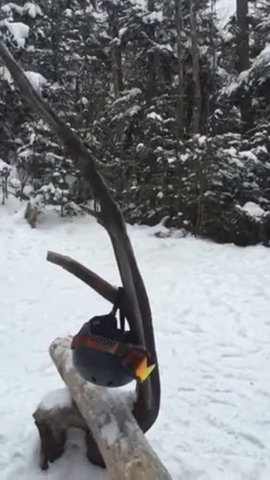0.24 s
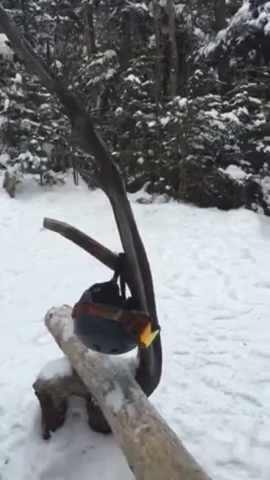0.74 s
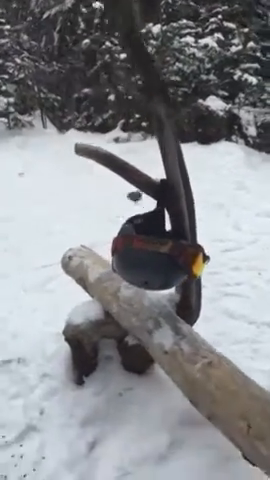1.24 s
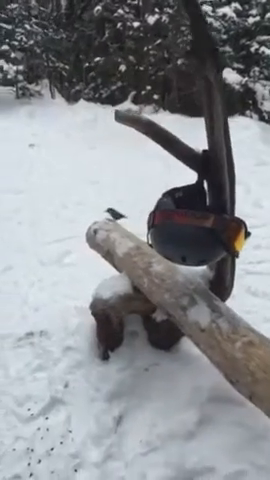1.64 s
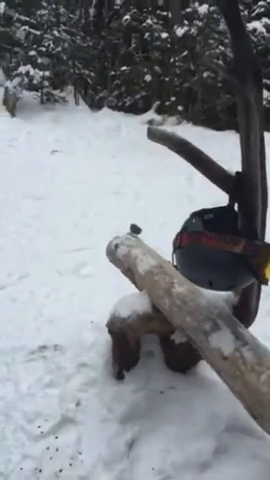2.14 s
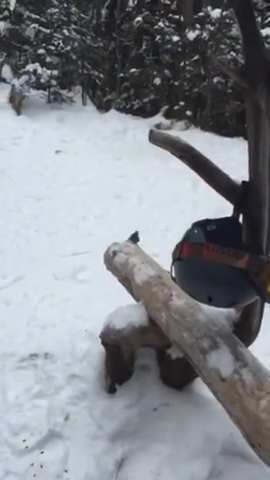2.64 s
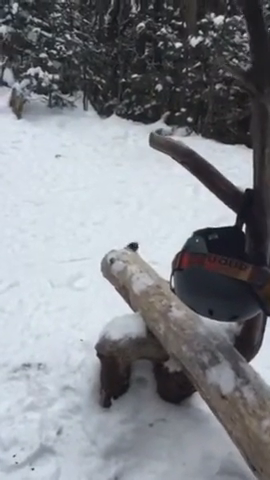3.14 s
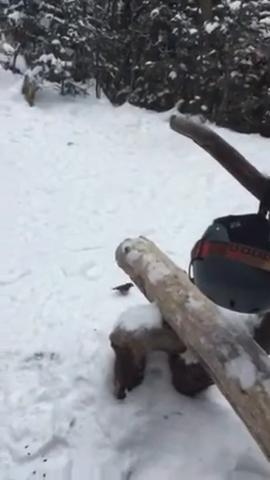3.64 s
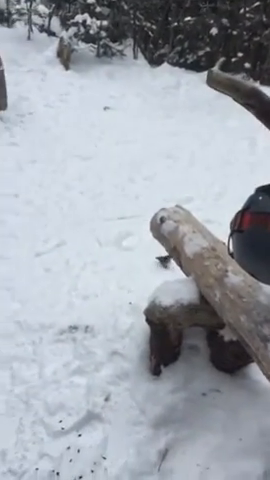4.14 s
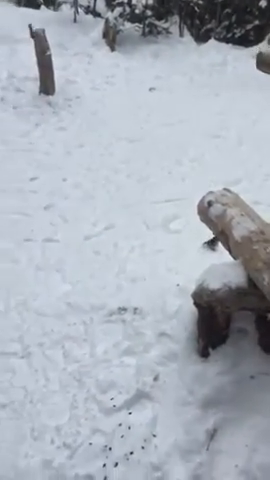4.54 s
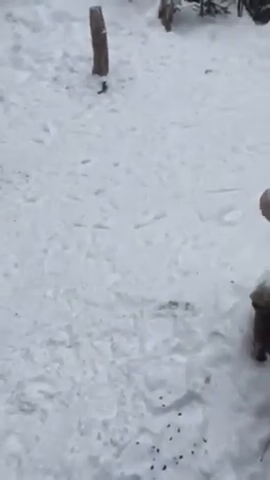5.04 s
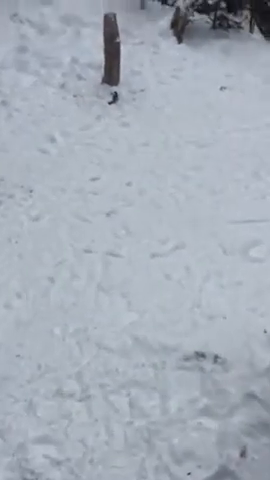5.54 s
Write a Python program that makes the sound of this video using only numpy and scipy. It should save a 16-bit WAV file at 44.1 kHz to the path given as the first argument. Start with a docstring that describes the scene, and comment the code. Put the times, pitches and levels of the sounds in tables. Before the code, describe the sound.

Quiet snowy woods, mono, close to a hand-held microphone, with very faint air. From 0.2 s a few weak snow crackles and low, soft bird-like peeps near 0.4 s. From about 0.6 to 1.6 s the first boot step crunches: crisp cracks joining into a gritty, uneven creak that turns knockier near 1.45 s, with a short cloth swish near 1.1 s. Then a hush until 3.9 s, holding a faint peep at 1.7 s, tiny ticks, weak snow slips around 2.5-2.9 s and a light cloth rustle near 3.5 s. A sharp crack at 3.9 s opens the second creaking step, until about 4.5 s; a rough rub and wavering squeak follow to 4.75 s. From 4.95 s heavier, thumpier crunches build into a dense creak around 5.4 s and settle until nearly 5.8 s, with jacket swish, low rumble and a faint high bird whistle near 5.1 s.

```python
"""Quiet woods: boots shift in cold packed snow, close below a hand-held camera.
The snow gives way in slips: single ones while the weight shifts, creaking runs in three slow steps.
Each slip mixes a thump, a knock, a crack and a chip, rung as one short wave that falls in pitch.
Shaped noise makes jacket swishes, soft rumble and air; a sole scrapes with a rub and a rough squeak.
Small birds call faintly as short sine whistles, and pulses through a resonance make quick runs of tiny ticks."""
import sys
import numpy as np
from scipy import signal
from scipy.fft import rfft, irfft, next_fast_len
from scipy.io import wavfile
from scipy.ndimage import map_coordinates

SR = 44100
rng = np.random.default_rng(int(sys.argv[2]) if len(sys.argv) > 2 else 0)


def wrap_up_sound(samples):
    """Save the sound to the file named by the first command line argument, as 16-bit audio."""
    columns = np.atleast_2d(samples).T
    # keep every value between -1 and 1, then stretch to whole-number steps
    tamed = np.clip(columns, -1, 1)
    steps = np.round(tamed * 32767).astype(np.int16)
    wavfile.write(sys.argv[1], SR, steps)


N = 254898  # samples in the scene

# Single slips of the snow. Each row: time in seconds, strength (knock and crack together) in dB,
# weight (thump over strength) in dB, crispness (crack over knock) in dB.
SLIPS = [(0.19, -53.5, -7, -3), (0.313, -48.5, -18, 9), (0.412, -62, -22, 15), (0.451, -60, -8, -6),
         (0.615, -38.5, -19, 18), (0.714, -51, 4, 1), (0.731, -53, 8, -6), (0.755, -42.5, -10.5, 7),
         (0.78, -42.5, 0.5, 34), (0.805, -37.5, -7, 22), (0.828, -38, -10, 30), (0.847, -43.5, 3, 11),
         (0.901, -44, 3, 3), (1.02, -41, -23, -2.5), (1.036, -38, -12, 7), (1.084, -40, -2, 6),
         (1.128, -35, -6.5, 3.5), (1.171, -38.5, -6, -8), (1.193, -41, 1, 14), (1.205, -38, -21, 8),
         (1.218, -42, -15, 4), (1.382, -39.5, -9, -5), (1.407, -36, -10, -2.5), (1.443, -30, -14, -3),
         (1.455, -34, -8, -7), (1.474, -37, -12, -5), (1.487, -32.5, -10.5, 2.5), (1.533, -35, -15, -1),
         (1.55, -37, -9, -11), (2.45, -48, -6, -30), (2.491, -59, -13, -12), (2.509, -55, -9, -11),
         (2.552, -50, -9, -8), (2.814, -50, -28, -1.5), (2.857, -52, 0.5, 5), (2.922, -49, -1.5, 3),
         (3.227, -59, -13, 10), (3.273, -56, -25, 3.5), (3.61, -52, -4, -34), (3.821, -58.5, -15, -6),
         (3.871, -53.5, -20, -10), (3.91, -31.5, -8.5, -9.5), (3.927, -45, -28, -5), (4.021, -37, -22, 4),
         (4.037, -38, -26, 3.5), (4.058, -33.5, -12.5, -7), (4.08, -37, -29, -13), (4.102, -39, -14, -9),
         (4.171, -38, -18, -7), (4.29, -40.5, -29, -3.5), (4.395, -39, -5, -5), (4.449, -35, -9.5, 5.5),
         (4.495, -35.5, -3, 1), (4.923, -54, -12, -5), (4.973, -40, -8.5, -2), (5.009, -34, -15, -5),
         (5.05, -33.5, -10, -6.5), (5.076, -41, -31, -1), (5.109, -29, -5, -2.5), (5.157, -31.5, -1.5, 14),
         (5.191, -34, 0, 2.5), (5.223, -36, 0, -0.5), (5.245, -39.5, -29, -13), (5.262, -36, 3, -6),
         (5.291, -41, 8.5, 3), (5.304, -41.5, -12, -3), (5.313, -38.5, 1, -7), (5.327, -40, -1, 1),
         (5.336, -31, -0.5, -7), (5.361, -37.5, 2, 6), (5.503, -34, -0.5, 1.5), (5.595, -35, -29, -4),
         (5.612, -40.5, -9, 5), (5.639, -35.5, -11, -1), (5.649, -39, -15, -2), (5.666, -43, -11, 12),
         (5.68, -41, -12, -4), (5.686, -37.5, -9, -2), (5.698, -39, -6, 3), (5.739, -39.5, -14, -7),
         (5.761, -42.5, -11, 6)]
# What a slip rings with: one list each for thump, knock, crack and chip.
# Each row: pitch in Hz and sharpness Q, both before the snow patch changes them, level within its list in dB.
BOOT_ON_SNOW = [
    [(214, 0.96, 0)],
    [(560, 4.13, 7), (1040, 1.46, -1)],
    [(1410, 1.03, 0.5), (2326, 2.8, 6.5), (3544, 4.7, -5.5)],
    [(4050, 5.1, 2.5), (4490, 1, -3.5)],
]
SLIP_S = .01  # seconds over which the level of a slip or tick is counted
SLIP_SIZE = 2048  # samples in one slip wave
WAKE_S = .016  # seconds for the scattered tail of a slip to fall by 60 dB


def amp(db):
    """Turn decibels into a gain."""
    return 10 ** (np.asarray(db) / 20)


def unit(x):
    """Scale x to an average (rms) level of 1."""
    return x / np.sqrt(np.mean(x ** 2) + 1e-20)


def curve(rows):
    """Draw straight lines through (seconds, dB) rows, one level per sample."""
    s, db = np.transpose(rows)
    return np.interp(np.arange(N) / SR, s, db)


def wobble(rate):
    """Draw a smooth random curve through `rate` random points a second."""
    points = rng.standard_normal(int(N * rate / SR) + 4)
    return map_coordinates(points, [np.arange(N) * rate / SR])


def filtered(x, response):
    """Multiply the spectrum of x by a response to frequency in Hz."""
    size = next_fast_len(N + SR // 2)
    spectrum = rfft(x, size) * response(np.fft.rfftfreq(size, 1 / SR))
    return irfft(spectrum, size)[..., :N]


def noise(colour):
    """Make noise of rms 1 whose spectrum follows (Hz, dB) points."""
    f, db = np.transpose(colour)
    shaped = filtered(rng.standard_normal(N), lambda hz: amp(np.interp(np.log(hz + 1), np.log(f), db)))
    return unit(shaped)


def air(drift_db):
    """The faint rush of the woods: coloured noise whose level drifts slowly."""
    # Each row: frequency in Hz, relative level in dB.
    air_colour = [(22, -32), (47, -9), (131, -4), (426, -13), (1020, -20), (5930, -27.5), (15500, -37.5)]
    return amp(-70.5 + drift_db * wobble(2.76)) * noise(air_colour)


def handling():
    """A soft rumble as the body and the camera move: low noise that swells and sinks."""
    # Each row: time in seconds, level in dB.
    rumble_level = [(0, -82.5), (3.7, -76), (3.87, -57), (3.97, -73), (4.5, -61.5), (4.75, -78.5),
                    (4.95, -55.5), (5.3, -63.5), (5.645, -48.5), (5.78, -68)]
    # Each row: frequency in Hz, relative level in dB.
    rumble_colour = [(20, -35), (45, -17), (75, 2.5), (120, -5), (250, -14), (600, -37)]
    return amp(curve(rumble_level)) * noise(rumble_colour)


def swish(gain_db, flutter_db, fold_db):
    """Cloth and powder hiss swells and fades with each move, fluttering as fibres catch and folds flap."""
    # Each row: time of the peak in seconds, level before gain_db in dB, rise and fall in seconds.
    swishes = [(0.9, -58.5, 0.25, 0.97), (1.08, -42, 0.056, 0.027), (1.29, -56, 0.13, 0.095),
               (1.52, -61.5, 0.42, 0.1), (1.718, -66.5, 0.079, 0.066), (3.459, -62.5, 0.13, 0.21),
               (4.082, -57.5, 0.1, 0.058), (4.48, -55.5, 0.2, 0.28), (4.69, -52, 0.38, 0.11),
               (5.47, -48, 0.23, 0.13), (5.77, -53, 0.12, 0.095)]
    # Each row: frequency in Hz, relative level in dB.
    swish_colour = [(150, -14), (400, 2.5), (1200, 1.5), (3000, 0), (4500, -1.5), (6500, -9), (9000, -5),
                    (10400, -12.5), (12000, -7.5), (15500, -18.5)]
    fade_db, roundness = 22, 1.26  # drop over one rise or fall; roundness of the peak
    t = np.arange(N) / SR
    power = amp(-81) ** 2  # cloth between swishes, also before gain_db
    for s, db, rise, fall in swishes:
        away = np.maximum((s - t) / rise, (t - s) / fall)
        power = power + amp(db - fade_db * np.minimum(away, 10) ** roundness) ** 2
    flutter = amp(flutter_db * wobble(210) + fold_db * wobble(61))
    hiss = unit(flutter * noise(swish_colour))
    return amp(gain_db) * np.sqrt(power) * hiss


def patch_at(times):
    """Look up the snow under the boot at each time: grit, ring, two tunings and one altered band."""
    # The bounce off each patch weakens one band, or lifts it where the last column is above 0.
    # Each row: start in seconds, grit (chip over crack) in dB, factor on the Q of thump and knock,
    # factor on their pitch, factor on the pitch of crack and chip, band centre in Hz, band change in dB.
    patches = [(0, -4.5, 0.7, 0.86, 0.62, 1980, -4), (0.7, -9, 3.13, 1.01, 0.89, 2940, -5),
               (0.84, -1.5, 1.86, 1.02, 0.91, 2660, -3.5), (1.028, -8, 0.95, 0.92, 1.05, 2540, -6),
               (1.185, -4, 0.81, 1.04, 1.05, 2440, -11), (1.23, -5.5, 2.1, 0.92, 0.84, 3240, -8),
               (1.33, -17, 1.42, 1.02, 0.93, 366, -8.5), (2.0, -12, 0.87, 1.02, 0.82, 950, -17),
               (2.7, -3.5, 0.98, 1.3, 0.79, 1040, 3), (3.1, -7.5, 1, 1, 1.42, 1980, 3),
               (3.85, -7.5, 0.68, 0.86, 1.12, 1030, 0), (4.0, -5, 0.93, 0.96, 1, 3320, -8),
               (4.21, -9.5, 1.1, 1.05, 1.24, 2970, -22), (4.35, -10, 1.25, 1.095, 1, 2497, -11),
               (4.9, -9, 0.8, 1, 1.03, 2480, -3), (5.24, -9.5, 1.09, 1.077, 1.065, 1144, -14),
               (5.55, -7, 1.6, 1.194, 0.9, 3270, -6)]
    rows = np.array(patches, float)
    return rows[np.searchsorted(rows[1:, 0], times), 1:].T


def slip_levels(times, strength_db, weight_db, crisp_db, extra_grit_db):
    """Share each slip's strength among thump, knock, crack and chip."""
    knock_db = strength_db - 10 * np.log10(1 + amp(crisp_db) ** 2)
    crack_db = knock_db + crisp_db
    chip_db = crack_db + patch_at(times)[0] + extra_grit_db
    return np.transpose([strength_db + weight_db, knock_db, crack_db, chip_db])


def slip_sounds(times, levels_db, thump_tune, detune, lag_s, scatter_hz):
    """Ring boot and snow once for each row of (thump, knock, crack, chip) levels."""
    count = len(levels_db)
    hz = np.fft.rfftfreq(SLIP_SIZE, 1 / SR) + 1
    t = np.arange(SLIP_SIZE) / SR
    chance = rng.standard_normal((count, len(BOOT_ON_SNOW) + 1))
    _, ring, tune, crack_tune, dip_hz, dip_db = patch_at(times)[:, :, None]
    power = 0
    for k, modes in enumerate(BOOT_ON_SNOW):
        # every slip breaks at another spot under the sole and rings a little higher or lower
        f = hz * np.exp(detune * chance[:, [k]])
        if k == 0:
            f = f / thump_tune[:, None]
        # the patch sets the pitch of all four, but the sharpness of only thump and knock
        if k < 2:
            sharp, f = ring, f / tune
        else:
            sharp, f = 1, f / crack_tune
        bell = 0
        for centre, q, db in modes:
            off_centre = sharp * q * (f / centre - centre / f)
            bell = bell + (amp(db) / (1 + off_centre ** 2)) ** 2
        power = power + amp(levels_db[:, [k]]) ** 2 * bell / bell.mean(axis=1, keepdims=True)
    band = np.exp(-(np.log(hz / dip_hz) / .12) ** 2)
    power = power * amp(dip_db * band) ** 2
    # folding the cepstrum gives causal ringing: a sudden start, then decay
    cepstrum = irfft(np.log(power * SLIP_S * SR + 1e-14) / 2)
    cepstrum[:, 1:SLIP_SIZE // 2] *= 2
    cepstrum[:, SLIP_SIZE // 2 + 1:] = 0
    # low waves travel more slowly through the snow, so each slip is a quick falling chirp
    delay = lag_s * np.exp(0.31 * chance[:, -1:]) / (1 + (hz / 650) ** 2)
    lag = 2 * np.pi * np.cumsum(delay, axis=1) * SR / SLIP_SIZE
    # short waves scatter on the crystals and trail behind; long ones arrive whole
    wake = rng.standard_normal((count, SLIP_SIZE)) * amp(-60 * t / WAKE_S)
    wake = rfft(wake / np.linalg.norm(wake, axis=1, keepdims=True))
    scattered = hz / (hz + scatter_hz)
    paths = np.sqrt(1 - scattered) + np.sqrt(scattered) * wake
    waves = irfft(np.exp(rfft(cepstrum) - 1j * lag) * paths)
    return waves * np.minimum(1, 2 * (1 - t / t[-1]))  # fade out over the second half


def placed(times, waves):
    """Add up the waves, each starting at its own time."""
    start = np.round(np.maximum(times, 0) * SR).astype(int)
    index = start[:, None] + np.arange(SLIP_SIZE)
    return np.bincount(index.ravel(), waves.ravel(), N)[:N]


def single_slips():
    """The crust holds, then gives all at once."""
    times, strength_db, weight_db, crisp_db = np.transpose(SLIPS)
    levels_db = slip_levels(times, strength_db, weight_db, crisp_db, extra_grit_db=-0.5)
    waves = slip_sounds(times, levels_db, thump_tune=np.full(len(times), 0.92), detune=0.088,
                        lag_s=0.002044, scatter_hz=2800)
    return placed(times, waves)


def fine_ticks():
    """Quick runs of tiny ticks that die away: uneven pulses through one resonance a run."""
    # Each row: start in seconds, length in seconds, ticks per second, starting level in dB, ring in Hz.
    tick_runs = [(0.212, 0.044, 96, -66.5, 3860), (2.179, 0.04, 380, -69.5, 3780),
                 (2.452, 0.136, 150, -64, 1110), (3.606, 0.021, 300, -61, 730),
                 (2.607, 0.033, 200, -69.5, 3440), (3.28, 0.068, 107, -59, 3270)]
    q, fade_db = 3.5, 12.5  # sharpness of the ring; drop over one run
    jitter, spread_db = .35, 2.5  # unevenness in tick spacings and in level
    out = np.zeros(N)
    for s, length, rate, db, ring_hz in tick_runs:
        chance = rng.standard_normal((int(length * rate) + 1, 2))
        age = (np.arange(len(chance)) + jitter * chance[:, 0]) / rate
        sizes = amp(db - fade_db * age / length + spread_db * chance[:, 1])
        pulses = np.bincount(np.round((s + age) * SR).astype(int), sizes, N)
        ring = filtered(pulses, lambda hz: 1 / (1 + 1j * q * ((hz + 1) / ring_hz - ring_hz / (hz + 1))))
        out += ring * np.linalg.norm(sizes) / np.linalg.norm(ring) * np.sqrt(SLIP_S * SR)
    return out


def bird(waver_hz):
    """Thin whistles of small birds: sines that swell, sag a little in pitch and fade."""
    # Each row: start in seconds, length in seconds, middle pitch in Hz, peak level in dB.
    calls = [(0.35, 0.07, 1400, -71), (0.404, 0.079, 940, -66), (1.684, 0.085, 2240, -68),
             (4.887, 0.11, 8000, -75), (5.05, 0.097, 8150, -66)]
    sag_hz_per_s = 580
    t = np.arange(N) / SR
    song = np.zeros(N)
    for s, length, hz, db in calls:
        age = np.clip(t - s, 0, length)
        pitch = hz - sag_hz_per_s * (age - length / 2) + waver_hz * wobble(120)
        swell = np.sin(np.pi * age / length)
        song += amp(db) * swell * np.sin(2 * np.pi * np.cumsum(pitch) / SR)
    return song


def creak(step, weight_db, sink_db, crisp_db, pack_db, jitter, spread_db, detune, stiffen):
    """Stick and slip at an uneven rate; the faster the run, the smaller and grittier its slips."""
    s, rate, load_db = np.transpose(step)
    clock = np.arange(s[0] * SR, s[-1] * SR) / SR
    turns = np.cumsum(np.interp(clock, s, rate)) / SR  # slips counted so far
    chance = rng.standard_normal((int(turns[-1]), len(BOOT_ON_SNOW) + 2))
    times = np.interp(np.arange(len(chance)) + .5 + jitter * chance[:, 0], turns, clock)
    slip_rate = np.interp(times, s, rate)
    strength_db = np.interp(times, s, load_db) - 10 * np.log10(slip_rate * SLIP_S) + spread_db * chance[:, 1]
    # as the boot sinks in, sink_db is added to the thump; as the snow packs, pack_db is taken off the crack
    progress = (times - s[0]) / (s[-1] - s[0])
    # faster slipping chips off more crystals: 7 dB per octave, none added at 266 slips per second
    extra_grit_db = 7 * np.log2(slip_rate / 266)
    levels_db = slip_levels(times, strength_db, weight_db + sink_db * progress,
                            crisp_db - pack_db * progress, extra_grit_db)
    levels_db = levels_db + 2 * chance[:, 2:]  # 2 dB of scatter in each part
    # fast crushing shifts the thump: up towards a groan if stiffen is positive, down if negative
    thump_tune = 1 + stiffen * (slip_rate / rate.max()) ** 2
    waves = slip_sounds(times, levels_db, thump_tune, detune, lag_s=0.001704, scatter_hz=4330)
    # a single slip takes the strain, so the small ones that fall next to it stay weak
    gap_s = np.abs(times[:, None] - np.array(SLIPS)[:, 0]).min(axis=1)
    return placed(times, waves * np.clip(gap_s * slip_rate, 0, 1)[:, None])


def scrape(gain_db, flutter_db, overtone_db):
    """The unloaded sole drags on after the second step: a rub and a rough squeak, both following its pitch."""
    # Each row: time in seconds, level before the rub and squeak gains in dB, squeak pitch in Hz.
    drag = [(4.479, -60, 1754), (4.54, -40, 1708), (4.572, -40, 1323), (4.6, -40.5, 1103),
            (4.622, -43, 1261), (4.642, -44, 1131), (4.67, -52.5, 1149), (4.708, -38.5, 1124),
            (4.766, -100, 1153), (4.806, -55.5, 1084), (4.952, -62.5, 1123)]
    # Each row: frequency in Hz at the final pitch of the drag, relative level in dB.
    rub_colour = [(100, -25), (300, -15), (550, -6), (850, -8.5), (1130, -10), (1500, -6.5), (2600, -15.5),
                  (5000, -24.5), (10000, -27.5)]
    s, db, hz = np.transpose(drag)
    t = np.arange(N) / SR
    contact = np.clip(np.minimum(t - s[0], s[-1] - t) / 0.0015, 0, 1)
    pitch = np.interp(t, s, hz)
    # the noise plays faster where the pitch is higher
    rub = map_coordinates(noise(rub_colour), [np.cumsum(pitch / hz[-1]) % N])
    rub = unit(amp(flutter_db * wobble(110)) * rub)
    phase = 2 * np.pi * np.cumsum(pitch * (1 + .07 * wobble(150))) / SR
    # random grip at 300 points a second roughens the squeak
    grip = wobble(300) + 1j * wobble(300)
    squeak = unit(np.real(grip * (np.exp(1j * phase) + amp(overtone_db) * np.exp(2j * phase))))
    return contact * amp(np.interp(t, s, db)) * (amp(gain_db) * rub + amp(-7) * squeak)


def woods(x, wet_db, t60, bend_hz):
    """Snow swallows nearly everything; the trunks send back a faint tail."""
    t = np.arange(SR // 2) / SR
    tail = rng.standard_normal(len(t)) * amp(-60 * t / t60) * (1 - np.exp(-t / 0.0017))
    echo = signal.fftconvolve(x, tail / np.linalg.norm(tail))[:N]
    # long waves bend round the trunks instead of coming back
    return x + amp(wet_db) * filtered(echo, lambda hz: (1j * hz / (1j * hz + bend_hz)) ** 2)


def scene():
    """Mix the three steps and the slips around them with cloth, scrape, ticks, birds, rumble and air."""
    # Creaks under a loaded sole; a "settle" is a further run around the end of its step.
    # Each row: time in seconds, slips per second, load in dB.
    first_step = [(0.725, 82.2, -47.5), (0.823, 85.3, -46.5), (0.86, 132, -45.5), (0.886, 86, -38.5),
                  (0.916, 151, -44), (0.986, 110.3, -42.5), (1.03, 108, -43), (1.06, 330, -46),
                  (1.15, 203, -47), (1.22, 388, -47), (1.3, 254, -39.5), (1.325, 163, -45)]
    first_settle = [(1.332, 71.5, -45), (1.433, 155.3, -38), (1.44, 78.9, -32), (1.53, 115.9, -44),
                    (1.575, 60.85, -50)]
    second_step = [(4.053, 81, -39.5), (4.124, 157.6, -41), (4.1835, 80.4, -44), (4.2124, 166.8, -41.5),
                   (4.225, 70.1, -43), (4.252, 123.5, -42), (4.305, 104.1, -41), (4.319, 183.9, -49.5),
                   (4.345, 132.4, -42.5), (4.38, 485, -43.5), (4.52, 557.6, -53.5)]
    third_step = [(5.341, 150.4, -36), (5.37, 178, -35), (5.41, 186, -37), (5.44, 382.8, -37),
                  (5.495, 297, -39), (5.53, 191, -53)]
    third_settle = [(5.57, 170.4, -49), (5.61, 168.7, -45), (5.635, 328, -40), (5.68, 140.8, -51),
                    (5.72, 130.5, -53)]
    snow = single_slips()
    snow = snow + creak(first_step, weight_db=-7.5, sink_db=0, crisp_db=14.5, pack_db=17,
                        jitter=.04, spread_db=1.2, detune=.097, stiffen=.02)
    snow = snow + creak(first_settle, weight_db=-21.5, sink_db=14, crisp_db=-4, pack_db=2,
                        jitter=.04, spread_db=2.3, detune=.022, stiffen=-.13)
    snow = snow + creak(second_step, weight_db=-22, sink_db=12, crisp_db=-2.5, pack_db=-13,
                        jitter=.04, spread_db=2.2, detune=.074, stiffen=.31)
    snow = snow + creak(third_step, weight_db=-7.5, sink_db=11, crisp_db=-.5, pack_db=11,
                        jitter=.1, spread_db=1.2, detune=.071, stiffen=.42)
    snow = snow + creak(third_settle, weight_db=-6, sink_db=4, crisp_db=-3, pack_db=-4.5,
                        jitter=.13, spread_db=4, detune=.098, stiffen=-.21)
    near = snow + swish(gain_db=4.5, flutter_db=1.5, fold_db=-2.5) + fine_ticks()
    near = near + scrape(gain_db=-9, flutter_db=1, overtone_db=-13)
    around = woods(near, wet_db=-10, t60=.084, bend_hz=340)
    mix = around + bird(waver_hz=30.1) + handling() + air(drift_db=2)
    return mix[None]  # one channel


def record(dry):
    """The camera keeps nothing above its band limit of 15700 Hz."""
    return filtered(dry, lambda hz: hz < 15700)


dry = scene()
out = record(dry)
wrap_up_sound(out)
```